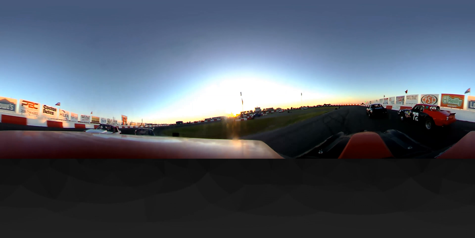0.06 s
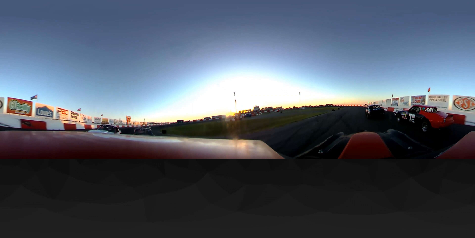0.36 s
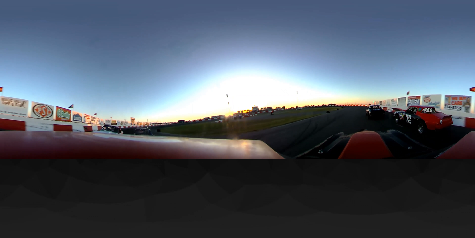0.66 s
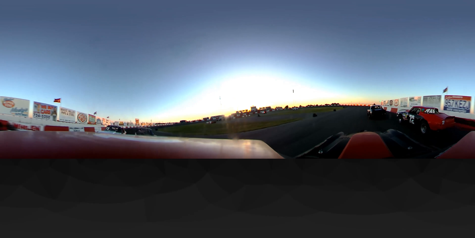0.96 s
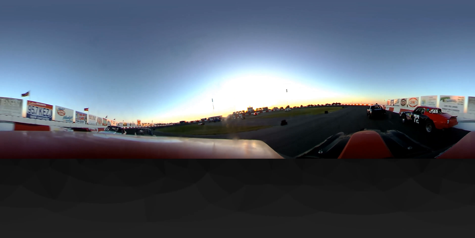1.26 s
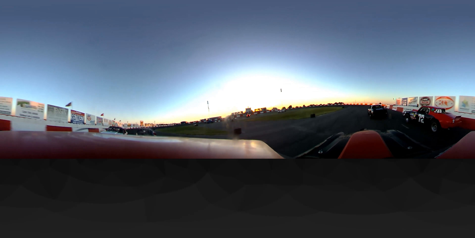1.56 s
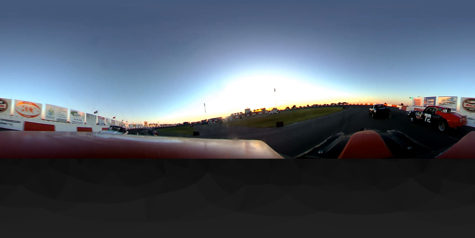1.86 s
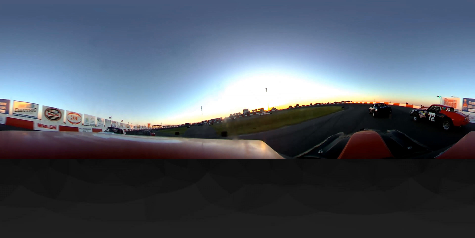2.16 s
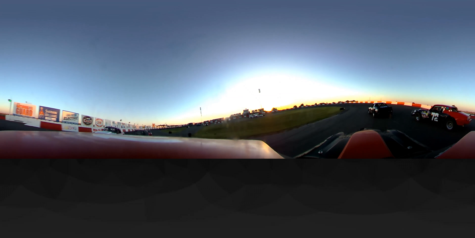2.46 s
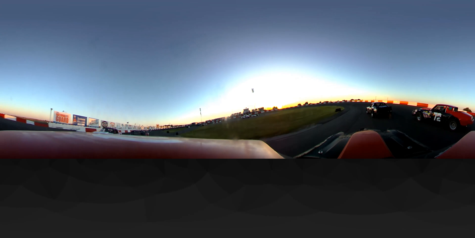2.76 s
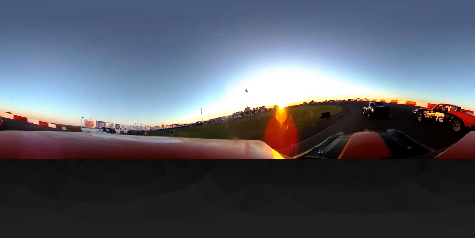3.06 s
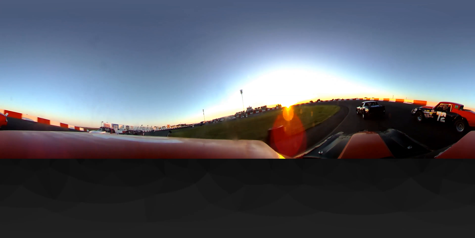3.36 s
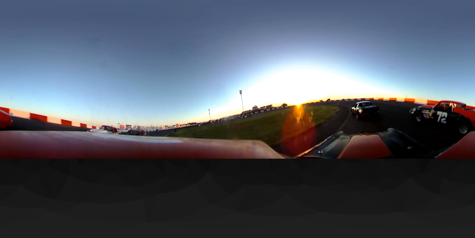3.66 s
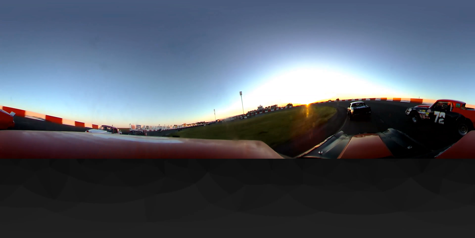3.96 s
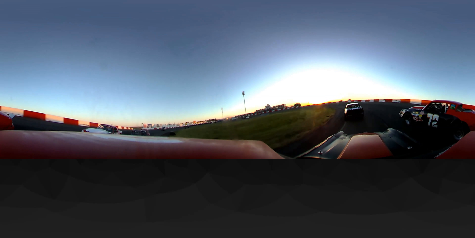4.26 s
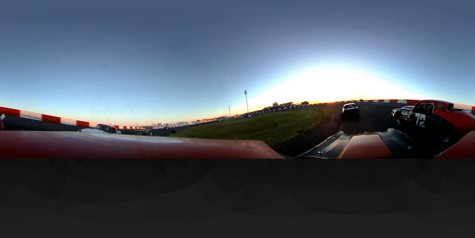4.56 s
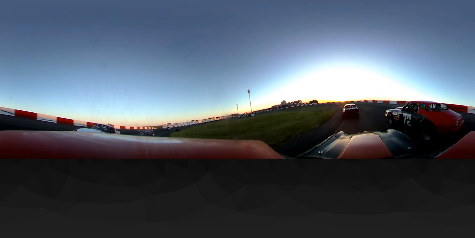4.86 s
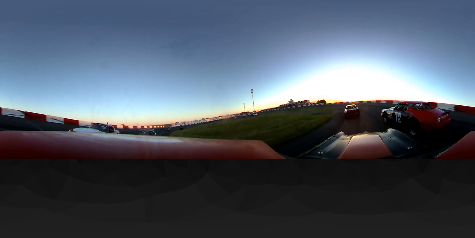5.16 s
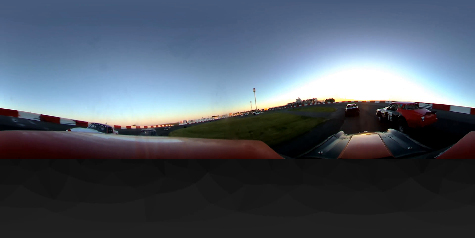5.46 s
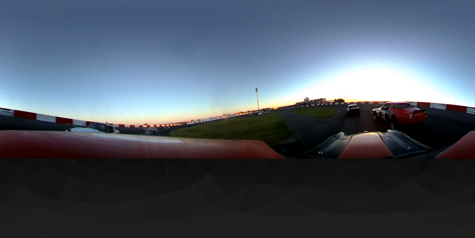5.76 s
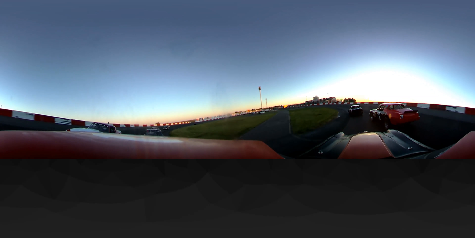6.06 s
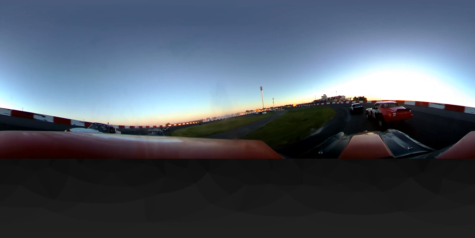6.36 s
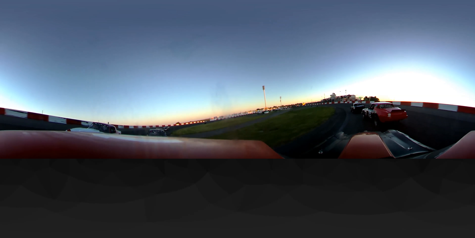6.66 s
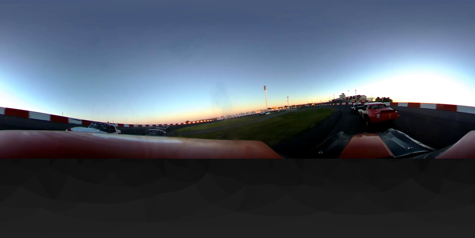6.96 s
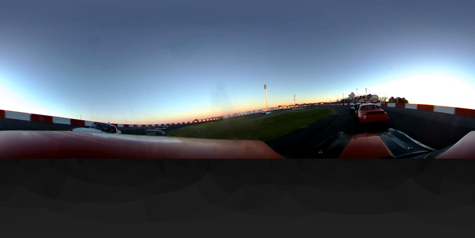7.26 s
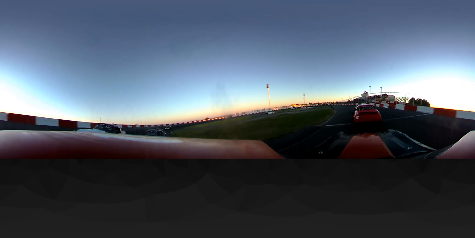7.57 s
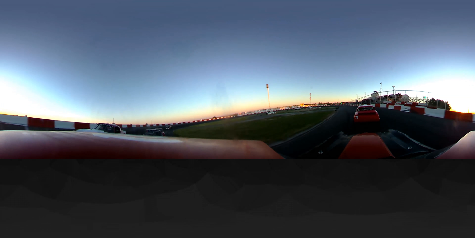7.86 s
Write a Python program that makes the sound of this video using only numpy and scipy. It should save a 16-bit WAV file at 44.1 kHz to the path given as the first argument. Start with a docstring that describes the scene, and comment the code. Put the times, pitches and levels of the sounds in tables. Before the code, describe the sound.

A V8 stock car roars around a short oval track, heard from on board. The engine climbs in pitch, drops as the driver lifts and coasts into the turn, then barks and climbs again. Its exhaust booms in the bare cabin, with another car fainter alongside. Wind buffets throughout, sheet metal rings and buzzes, and small jolts and grit ticks dot the road rumble.

```python
"""A V8 stock car, heard on board on a short oval: it pulls, lifts and coasts into the turn, pulls again.
Its exhaust booms in the bare cabin and barks through the pipes; a rival runs alongside.
Wind buffets the cabin, air roars and blurts, sheet metal rings and buzzes. The drive line hums,
road and panels rumble, bumps jolt the car, grit ticks. A fast limiter holds the level steady."""
import sys
import numpy as np
from scipy import signal
from scipy.fft import rfft, irfft
from scipy.io import wavfile
from scipy.ndimage import uniform_filter1d

SR = 44100
rng = np.random.default_rng(int(sys.argv[2]) if len(sys.argv) > 2 else 0)


def materialize(psi):
    """Save the field psi as 16-bit PCM at rate SR to the path in sys.argv[1].

    A 1-D psi becomes a single channel; in a 2-D psi each row is a channel.
    """
    bounded = np.clip(np.atleast_2d(psi).T, -1, 1)
    quanta = np.round(bounded * 32767).astype(np.int16)
    wavfile.write(sys.argv[1], SR, quanta)


N = 348390
TIME_S = np.arange(N) / SR
FREQS_HZ = np.fft.rfftfreq(N, 1 / SR)

# engine speed, eight firings a cycle: (time [s], four-stroke cycle rate [Hz])
ENGINE_SPEED = [(0.0, 38.03), (0.2, 38.34), (1.02, 40.67), (1.72, 42.52), (1.83, 37.45), (2.0, 38.83),
                (2.55, 37.56), (3.4, 32.86), (3.75, 29.11), (4.0, 27.5), (4.4, 26.0), (4.85, 25.0),
                (4.98, 30.8), (5.87, 33.24), (6.64, 34.94), (6.9, 35.12), (7.66, 36.77), (7.9, 36.87)]
# low orders: {order: (coasting [dB], pulling at low revs [dB], pulling at high revs [dB])}
BOOM_ORDERS = {3: (-20, -25, -25), 4: (-31, -26, -24), 5: (-25, -37.5, -17.5), 6: (-30.5, -27, -28)}
# cabin resonances: (frequency [Hz], gain [dB])
CABIN_RESPONSE = [(75, -25), (88, -16), (104, -11), (113, -0.5), (128, 0.5), (140, -14), (150, -13.5),
                  (160, -2), (168, 4), (181, -1), (188, -10), (199, -6.5), (209, -22.5), (238, -6),
                  (260, -24)]
# exhaust under load: (time [s], gain [dB])
EXHAUST_LOAD = [(0, -42), (.25, -34.5), (.8, -31.5), (1.15, -39.5), (1.68, -39.5), (1.85, -44.5),
                (2.3, -45.5), (2.7, -55.5), (4.05, -46.5), (4.87, -49), (5.03, -37.5), (5.55, -38),
                (5.9, -38), (6.4, -36.5), (6.9, -41.5), (7.9, -39.5)]
# unevenly firing banks: {order: (low revs [dB], high revs [dB])}
FIRING_ORDERS = {2: (-3.2, -11.5), 7: (7.8, -5), 8: (13, 13.8), 9: (8.6, 9.3), 10: (6, 0), 11: (6.5, 3.83),
                 12: (4, 1), 13: (3.1, -7.5), 14: (-2, -1.5), 15: (-0.67, 1.7), 16: (-1.7, 6.5),
                 17: (1, 1.5), 18: (-5, -8), 19: (0, -6.5), 20: (-5.5, 2), 22: (-5.5, -1.2),
                 23: (-2, -10.5), 24: (1.5, 3.8), 25: (-6.5, -5)}
# exhaust pipe slope: (frequency [Hz], gain [dB])
PIPE_RESPONSE = [(70, 12), (250, -10.5), (430, -14), (650, -13.5), (1000, -15.5)]
# pipe and body shell resonances: (frequency [Hz], width [Hz], gain [dB])
SHELL_MODES = [(264, 14, 7.5), (311, 18, 5), (365.2, 53, 9.0), (405.8, 12.5, 9), (444.2, 61.6, 15.5),
               (525, 34, 14.5)]
# two lowest cabin air resonances: (time [s], lower level [dB], upper level [dB])
BUFFET_LEVELS = [(0, -20.5, -45), (.6, -20.5, -39), (1.4, -39.5, -32.5), (1.8, -29, -27.5),
                 (2.6, -23.5, -42), (3.25, -29.5, -32), (3.8, -24.5, -20.5), (4.55, -19.5, -29.5),
                 (5.1, -19, -27.5), (6.3, -24.5, -24), (7.1, -20.5, -32), (7.9, -27, -28)]
# drive line, following road speed: (time [s], frequency [Hz])
SHAFT_SPEED = [(0, 46.76), (1.4, 52.53), (2, 49), (3, 47), (3.5, 44), (4.6, 36.7), (5.8, 41.56),
               (7.9, 45.26)]
# rushing air: (time [s], roar level [dB], bodywork buzz level [dB])
AIR_LEVELS = [(0, -44.5, -61), (.4, -35, -55.5), (1.1, -39.5, -58.5), (1.8, -42, -58.5), (2.62, -44, -59),
              (2.84, -42.5, -60), (3.08, -48.5, -65.5), (3.6, -44.5, -62.5), (3.95, -43.5, -65.5),
              (4.35, -49, -70), (4.88, -47, -70.5), (5, -44.5, -65), (6.35, -40.5, -63), (6.93, -44.5, -71),
              (7.3, -42.5, -75.5), (7.9, -38.5, -64.5)]
# ringing sheet metal: (frequency [Hz], width [Hz], level re roar [dB])
METAL_MODES = [(1689, 31, -14.5), (1748, 97, -17), (2343, 230, -24)]
# noise spectra: (frequency [Hz], relative density [dB])
ROAR_SPECTRUM = [(250, -18.5), (550, -1), (660, 0), (740, -1.5), (950, -0.5), (1150, -7), (1550, -7.5),
                 (1780, -8), (1950, -18.5), (2150, -22), (2400, -23.5), (2950, -27), (3300, -34.5),
                 (8000, -43)]
BUZZ_SPECTRUM = [(1500, -26.5), (2600, 11.5), (3400, -0.5), (4000, 3), (4600, 4.5), (5600, 1.5),
                 (7000, -5.5), (8300, -0.5), (9700, -15.5), (11300, -4.5), (13000, -21), (14300, -12),
                 (15000, -27)]
BLURT_SPECTRUM = [(150, -13), (350, 6), (600, 4), (1000, -14.5), (1750, -25), (2200, -31.5), (3500, -43.5),
                  (9000, -58)]
ROAD_SPECTRUM = [(10, -14.5), (22, -8.5), (35, -4), (68, -8), (100, 1.5), (145, -4), (220, -11), (400, -32),
                 (900, -69.5)]
PANEL_SPECTRUM = [(120, -28), (200, 4.5), (275, -1.5), (330, 3.5), (410, -1), (440, 0), (485, 0), (535, -7),
                  (600, -8), (800, -26.5), (2000, -61.5)]
CHATTER_SPECTRUM = [(1500, -9.5), (4500, 3.5), (12000, -3), (16000, -7.5)]
# blurts in the roar, bumps, grit strikes: (time [s], strength [dB])
BLURT_EVENTS = [(0.05, -28), (0.171, -18), (0.209, -24), (0.331, -26), (0.533, -14), (0.785, -12),
                (0.829, -18), (1.15, -19), (3.907, -23), (4.037, -17), (5.24, -19), (5.307, -14),
                (5.394, -14), (7.154, -29), (7.267, -14.5)]
BUMP_EVENTS = [(.43, -56), (.535, -57), (1.151, -62), (2.37, -59), (2.765, -59), (2.86, -60), (3.215, -63),
               (3.755, -61), (4.035, -63), (4.435, -64.5), (4.8, -63), (5.305, -64)]
GRIT_EVENTS = [(0.168, -59), (0.829, -52), (1.9205, -49), (2.3665, -56), (2.5805, -51), (4.6658, -57),
               (5.8077, -55), (6.2861, -50), (6.7321, -51)]


def engine(crank_rad, cycle_hz):
    """The V8: clean low orders boom through the cabin resonances, under the bark of the pipes."""
    pedal, high, boom = throttle(), high_revs(cycle_hz), np.zeros(N)
    for order, (coast_db, low_db, high_db) in BOOM_ORDERS.items():
        pull_db = (1 - high) * low_db + high * high_db
        db = (1 - pedal) * coast_db + pedal * pull_db
        gain = amp(db + wander(5)) * response(CABIN_RESPONSE, order * cycle_hz)
        boom += gain * unit(np.cos(order * crank_rad + 0.68 * rng.standard_normal()))
    bark = exhaust(crank_rad, cycle_hz, scatter_rad=1.28, roughness=0.21, flutter_db=3.0)
    return boom + amp(curves(EXHAUST_LOAD)[0]) * bark


def exhaust(crank_rad, cycle_hz, scatter_rad, roughness, flutter_db):
    """One uneven burst of firings a cycle; its orders swell as they cross shell resonances."""
    orders = list(FIRING_ORDERS)
    low_db, high_db = np.transpose(list(FIRING_ORDERS.values()))
    grid_s, grid_hz = TIME_S[::200], cycle_hz[::200]
    high, bark = high_revs(grid_hz), np.zeros(N)
    for order in range(1, 40):
        if order in BOOM_ORDERS:
            continue
        hz = order * grid_hz
        db = (1 - high) * np.interp(order, orders, low_db) + high * np.interp(order, orders, high_db)
        for mode_hz, width_hz, peak_db in SHELL_MODES:
            db += peak_db * resonance(hz, mode_hz, width_hz)
        db += flutter_db * unit(uniform_filter1d(rng.standard_normal(len(grid_s)), size=40))
        gain = amp(db) * response(PIPE_RESPONSE, hz) / (1 + (hz / 1250) ** 4) / (1 + (55 / hz) ** 4)
        tone = np.cos(order * crank_rad + scatter_rad * rng.standard_normal())
        bark += np.interp(TIME_S, grid_s, gain) * tone
    burst_strength = 1 + roughness * wander(48)
    return np.sqrt(2) * bark * burst_strength


def throttle(lift_s=1.73, open_s=4.5, travel_s=0.14):
    """1 with the pedal down, 0 coasting."""
    return np.clip(.5 + np.maximum(lift_s - TIME_S, TIME_S - open_s) / travel_s, 0, 1)


def high_revs(cycle_hz, from_hz=35.35, span_hz=3.2):
    """Firing pattern blend: 0 at low revs, 1 at high revs."""
    return np.clip((cycle_hz - from_hz) / span_hz, 0, 1)


def rival(cycle_hz, lead_s=0.25, speed_ratio=1.07):
    """The car alongside: same line a moment earlier, at its own engine speed."""
    hz = speed_ratio * np.interp(TIME_S + lead_s, TIME_S, cycle_hz) * (1 + 0.004124 * wander(2.92))
    gain = amp(np.max(curves(EXHAUST_LOAD)[0]) - 24.5)
    return gain * exhaust(phase(hz), hz, scatter_rad=2.04, roughness=0.62, flutter_db=3.5)


def buffet(lower_hz=106.92, upper_hz=169.8):
    """Wind across the open cabin: an unsteady throb and a lurching burble above it."""
    lower_db, upper_db = curves(BUFFET_LEVELS)
    throb = unit(np.sin(phase(lower_hz + 4.16 * wander(9.95))) + 0.63 * ring(lower_hz, width_hz=32))
    burble = unit(np.sin(phase(upper_hz + 14 * wander(11.62))) + 0.95 * ring(upper_hz, width_hz=49))
    return amp(lower_db + 1.6 * wander(4)) * throb + amp(upper_db) * burble


def drive_line(frame_hz=43.6, coasting_db=4.5):
    """Shaft hum: swells at a frame resonance, and grows louder off the throttle."""
    shaft_hz = curves(SHAFT_SPEED)[0]
    db = -31 + 9 * resonance(shaft_hz, frame_hz, width_hz=3.2) + coasting_db * (1 - throttle())
    gain = amp(db + wander(3.2))
    return gain * unit(np.sin(phase(shaft_hz)) + 0.35 * ring(shaft_hz, width_hz=33))


def rumble(panel_db=-37, power_boost_db=3, road_db=-25):
    """Panels rumble, more under power, over steady road noise."""
    panel_gain = amp(panel_db + power_boost_db * throttle() + 3.3 * wander(22))
    return panel_gain * shaped(white(), PANEL_SPECTRUM) + amp(road_db) * shaped(white(), ROAD_SPECTRUM)


def air(crank_rad):
    """Gusty roar, pulsing with the exhaust under load; it shakes sheet metal into ring and buzz."""
    roar_db, buzz_db = curves(AIR_LEVELS)
    load = amp(curves(EXHAUST_LOAD)[0])
    pulse = np.cos(crank_rad) + .6 * np.cos(2 * crank_rad) + .55 * np.cos(3 * crank_rad)
    puffs = 1 + .45 * load / load.max() * pulse
    gust = unit(0.26 * wander(18) + wander(26) + 0.85 * wander(130))
    roar = shaped(white() * puffs * amp(1.8 * gust), ROAR_SPECTRUM)
    metal = sum(amp(db) * ring(hz, width_hz) for hz, width_hz, db in METAL_MODES)
    shaking = white() * np.sqrt(abs(puffs))
    rattle_db = 1.9 * gust + 0.8 * wander(30) + 2.8 * wander(500)
    buzz = shaped(shaking * amp(rattle_db), BUZZ_SPECTRUM)
    return amp(roar_db) * (roar + metal) + amp(buzz_db) * buzz


def blurts(rise_s=0.0026, fade_s=0.008, weak_per_s=1.5):
    """Short, coarse puffs out of the roar, with weak ones at random."""
    weak = [(i / SR, -33.5) for i in np.flatnonzero(rng.random(N) < weak_per_s / SR)]
    events = BLURT_EVENTS + weak
    envelope = decays(events, fade_s) - decays(events, rise_s)
    return envelope * shaped(white(), BLURT_SPECTRUM)


def bumps_and_grit(jolt_over_chatter_db=19):
    """Each bump: a dull jolt and ragged panel chatter. Grit only ticks."""
    bumps = decays(BUMP_EVENTS, fade_s=0.024)
    grit = decays(GRIT_EVENTS, fade_s=0.002)
    chatter = shaped(white() * amp(4 * wander(400)), CHATTER_SPECTRUM)
    jolt = amp(jolt_over_chatter_db) * shaped(white(), ROAR_SPECTRUM)
    return (bumps + grit) * chatter + bumps * jolt


def amp(db):
    """Decibels to gain."""
    return 10 ** (np.asarray(db) / 20)


def unit(x):
    """Scale to rms 1."""
    return x / np.sqrt(np.mean(x ** 2) + 1e-20)


def curves(rows):
    """Columns of a timed table, per sample."""
    times_s, *columns = np.transpose(rows)
    return [np.interp(TIME_S, times_s, column) for column in columns]


def response(spectrum, hz):
    """Gain of a spectrum at hz."""
    points_hz, db = np.transpose(spectrum)
    return amp(np.interp(np.log(hz + 1), np.log(points_hz + 1), db))


def shaped(x, spectrum):
    """Filter by a spectrum; rms 1."""
    return unit(irfft(rfft(x) * response(spectrum, FREQS_HZ), N))


def white():
    """White noise."""
    return rng.standard_normal(N)


def wander(hz):
    """Smooth random drift up to about hz; rms 1."""
    return unit(irfft(rfft(white()) / (1 + (FREQS_HZ / hz) ** 4), N))


def phase(hz):
    """Running phase [rad] of a frequency or frequency curve."""
    return 2 * np.pi * np.cumsum(hz * np.ones(N)) / SR


def ring(hz, width_hz):
    """Resonance stirred by turbulence; rms 1."""
    rad = phase(hz)
    return unit(wander(width_hz / 2) * np.cos(rad) + wander(width_hz / 2) * np.sin(rad))


def resonance(hz, centre_hz, width_hz):
    """Bell curve: 1 at the centre, 0.5 at the edges."""
    return 1 / (1 + (2 * (hz - centre_hz) / width_hz) ** 2)


def decays(events, fade_s):
    """Envelope of events that start at once and die away."""
    kicks = np.zeros(N)
    for time_s, db in events:
        kicks[int(time_s * SR) % N] += amp(db)
    return signal.lfilter([1], [1, -np.exp(-1 / (fade_s * SR))], kicks + 1e-20)


def scene():
    """All sources as heard in the cabin; mono."""
    cycle_hz = curves(ENGINE_SPEED)[0]
    crank_rad = phase(cycle_hz * (1 + .001 * wander(14)))  # 2 pi per four-stroke cycle
    cars = engine(crank_rad, cycle_hz) + rival(cycle_hz) + drive_line() + rumble()
    return (cars + buffet() + air(crank_rad) + bumps_and_grit() + blurts())[None]


def record(dry, threshold_db=-20.5, makeup_db=2.5, cutoff_hz=14300):
    """Fast limiter, soft ends, low-pass."""
    power_db = 10 * np.log10(abs(uniform_filter1d(dry[0] ** 2, size=900)) + 1e-12)
    over_db = uniform_filter1d(np.maximum(power_db - threshold_db, 0), size=400)
    limited = dry * amp(makeup_db - 0.93 * over_db)
    faded = limited * signal.windows.tukey(N, .0004)
    low_pass = signal.firwin(511, cutoff_hz, window=("kaiser", 9), fs=SR)
    return signal.oaconvolve(faded, low_pass[None], "same")


dry = scene()
out = record(dry)
materialize(out)
```